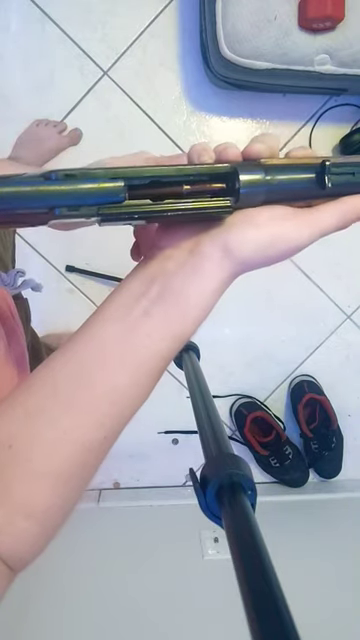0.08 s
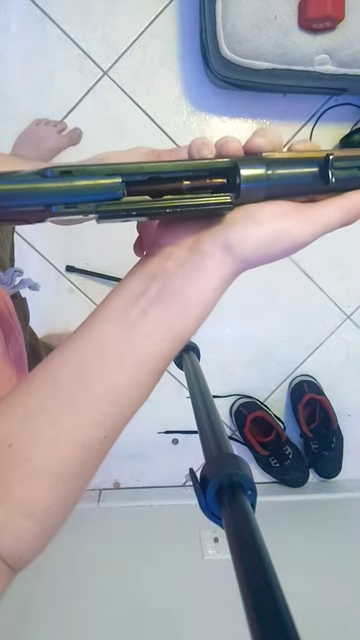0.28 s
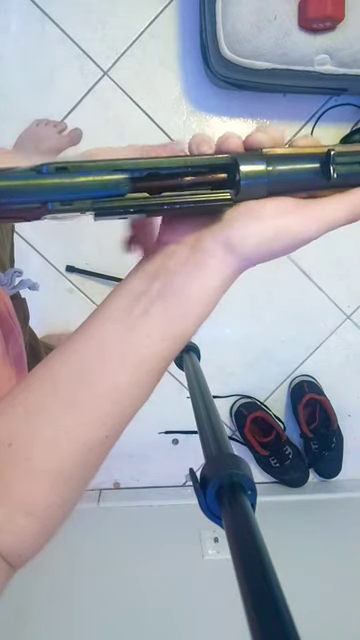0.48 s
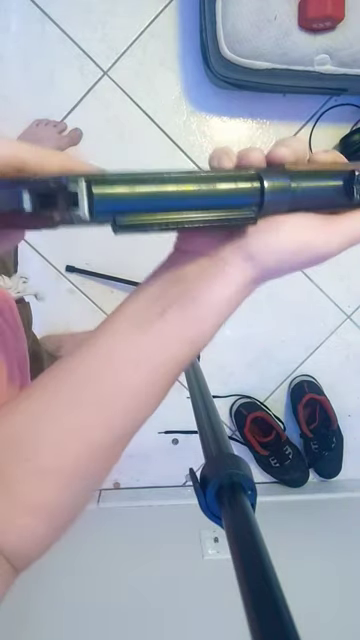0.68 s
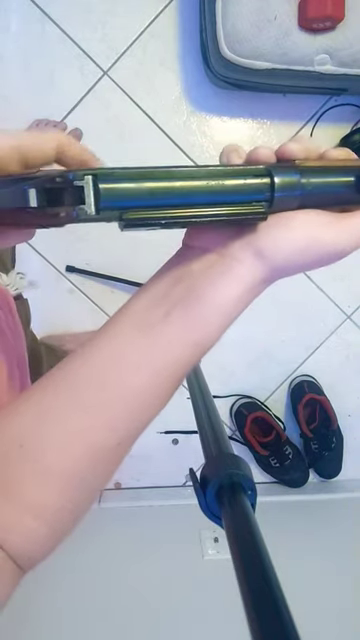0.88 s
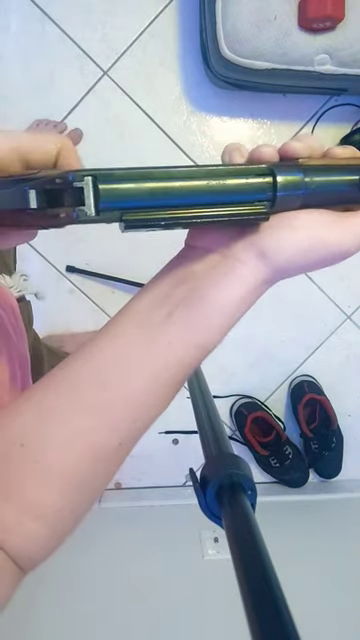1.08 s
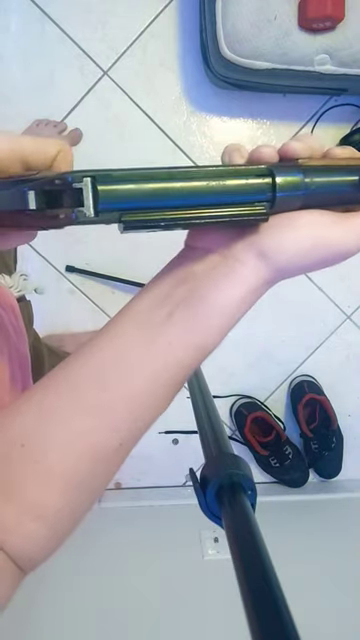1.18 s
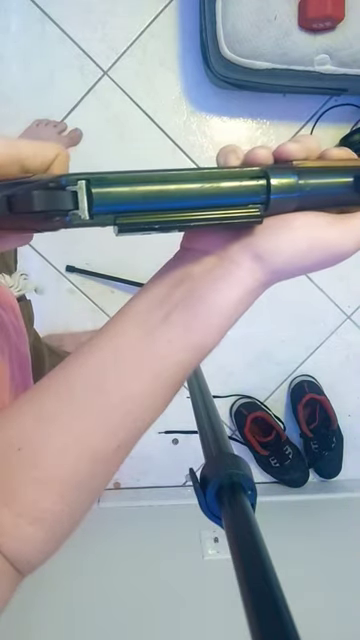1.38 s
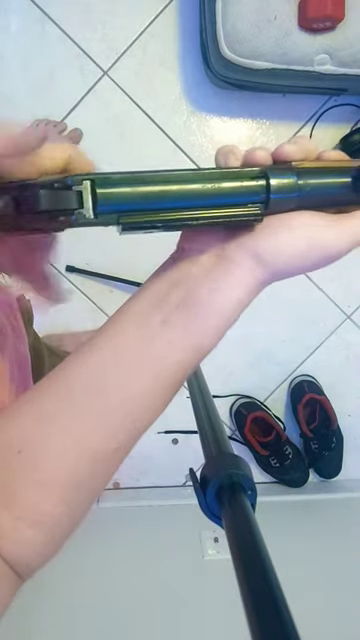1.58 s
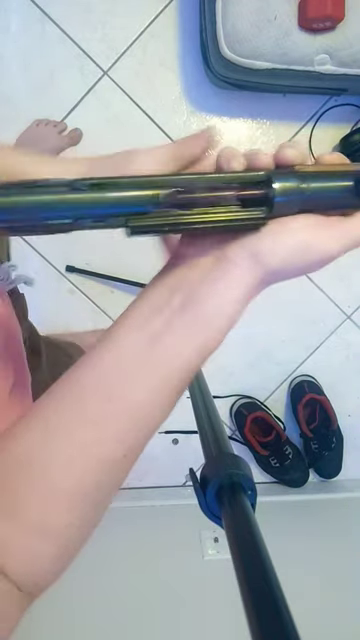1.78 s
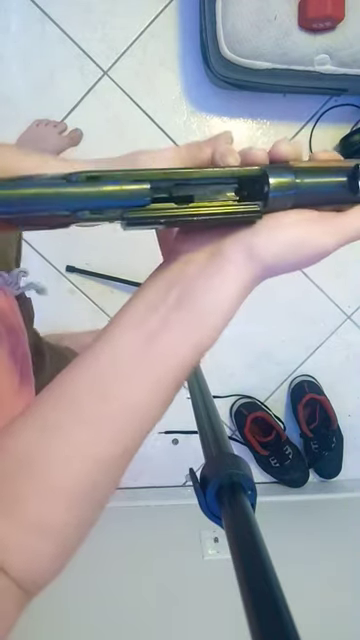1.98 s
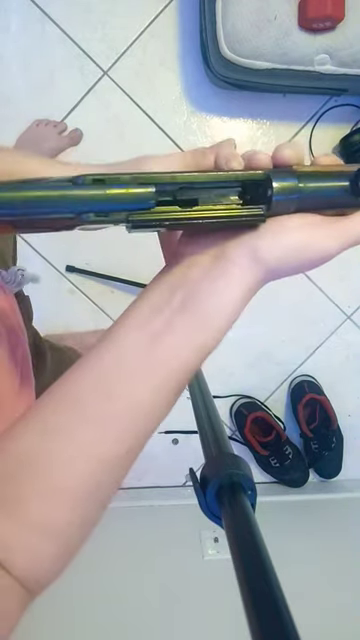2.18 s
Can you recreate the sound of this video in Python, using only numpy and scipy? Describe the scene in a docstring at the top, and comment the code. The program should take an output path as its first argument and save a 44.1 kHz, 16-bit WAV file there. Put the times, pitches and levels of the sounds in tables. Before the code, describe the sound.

Close, bright metallic rifle handling in a hard small room: cartridge clinks and dull knocks on tile, quick closing clacks, a pause, one loud hammer snap, another pause, then a fast opening clatter.

```python
"""Lever rifle in a tiled room

A lever rifle is worked close to a microphone in a small tiled room, over a low murmur of air.
An ejected dummy cartridge bounces on the floor with a thin high ring while the action is closed;
then the trigger clicks, the hammer falls, and the lever is thrown open again.
Knocks and clacks are short bursts of filtered noise, and scrapes are streams of tiny clicks.
Rings are fading sine waves. A noise suppressor turns down the quiet parts."""
import sys
import numpy as np
from scipy import signal
from scipy.fft import rfft, irfft
from scipy.io import wavfile
from scipy.ndimage import uniform_filter1d

SR = 44100
rng = np.random.default_rng(int(sys.argv[2]) if len(sys.argv) > 2 else 0)


def transcribe(u):
    """Save the signal u as a 16-bit wav file named by the first command-line argument.

    u: samples, shape (n,) or (channels, n), limited to [-1, 1]; the rate is SR.
    q: integer samples, one column per channel.
    """
    v = np.clip(np.atleast_2d(u).T, -1, 1)
    q = np.round(v * 32767).astype(np.int16)
    wavfile.write(sys.argv[1], SR, q)


N = 99225


def amp(db):
    """Turns decibels into a gain."""
    return 10 ** (np.asarray(db) / 20)


def unit(x):
    """Scales a sound to an energy of one."""
    return x / np.sqrt(np.sum(x ** 2) + 1e-20)


def read(points, hz):
    """Reads a table between its points, on a log-frequency axis."""
    f, value = np.transpose(points)
    return np.interp(np.log(hz + 1), np.log(f + 1), value)


def add(mix, start_s, sound):
    """Mixes a sound in at a time; anything past the end is dropped."""
    part = mix[max(round(start_s * SR), 0):][:len(sound)]
    part += sound[:len(part)]


# Room murmur, relative spectrum: f/Hz, level/dB
HUSH_SPECTRUM = [(20, -49), (66, -5), (123, -16), (161, -3), (200, -21), (400, -21.5), (800, -29),
                 (2000, -24), (9000, -31), (16000, -49.5)]


def hush():
    """The low murmur of air in the room is steady noise shaped by a spectrum."""
    spectrum = rfft(rng.standard_normal(N)) * amp(read(HUSH_SPECTRUM, np.fft.rfftfreq(N, 1 / SR)))
    return amp(-55) * np.sqrt(N) * unit(irfft(spectrum, N))  # RMS level -55 dB


# Resonances of a struck part: f as a multiple of its main resonance, share of the resonance level
PART_RESONANCES = [(1, 1), (1.43, 0.64), (2.1, .5)]
RESONANCE_WIDTH = 0.07  # half width, as a share of the frequency


def colour(x, points, tilt_db, peak_hz, peak_db, size=2048):
    """A struck part favours its resonances: a causal filter of unit energy with spectrum and tilt."""
    hz = abs(np.fft.fftfreq(size, 1 / SR))
    peaks_db = 0
    for ratio, share in PART_RESONANCES:
        distance = (hz / (ratio * peak_hz) - 1) / RESONANCE_WIDTH
        peaks_db = peaks_db + share * peak_db / (1 + distance ** 2)
    slope_db = tilt_db * np.log2(np.maximum(hz, 200))  # flat below 200 Hz
    log_gain = np.log(amp(read(points, hz) + peaks_db + slope_db))
    # minimum phase: the filter responds as early as its spectrum allows
    taps = np.fft.ifft(np.exp(np.conj(signal.hilbert(log_gain)))).real
    return signal.fftconvolve(x, unit(taps[:size // 2]))


def contact(decay_s, size=4096):
    """Parts chatter as they touch: a fading noise burst, its spectrum evened out before a last fade."""
    fade = np.exp(-np.arange(size) / SR / max(decay_s, 1e-4))
    spectrum = rfft(rng.standard_normal(size) * fade)
    even = irfft(spectrum / (abs(spectrum) + 1e-12))
    return unit(even * np.sqrt(fade)) * np.linalg.norm(fade)  # longer bursts carry more energy


def blows(rows, points):
    """Each row of a table of blows becomes one coloured burst of contact noise."""
    out = np.zeros(N)
    for start_s, db, tilt_db, decay_s, peak_hz, peak_db, *_ in rows:
        burst = colour(contact(decay_s), points, tilt_db, peak_hz, peak_db)
        add(out, start_s, amp(db) * burst)
    return out


# How long the room rings: f/Hz, time to fall 60 dB/s
ROOM_DECAY = [(100, 1), (400, 0.39), (1500, 0.57), (3500, 0.41), (7500, 0.43), (11000, 0.49), (15000, 0.46)]
ROOM_GAP_S, ROOM_RISE_S = 0.0013, 0.011  # silence before the reflections, then their build-up


def tail():
    """Scattered reflections are noise in which each band dies at its own speed."""
    hz, t, bands = signal.stft(rng.standard_normal(SR), SR, nperseg=256)
    fade = amp(-60 * t / read(ROOM_DECAY, hz)[:, None])
    reflections = signal.istft(bands * fade, SR, nperseg=256)[1][:SR]
    build_up = np.clip((np.arange(SR) / SR - ROOM_GAP_S) / ROOM_RISE_S, 0, 1)
    return unit(reflections * build_up)


ECHO_S = 0.084  # delay of the late echo


def room(x, wet_db, late_db=0):
    """The room returns a dense tail, then a late echo with a tail of its own."""
    response = tail()
    add(response, ECHO_S, amp(-22 + late_db) * unit(contact(decay_s=0.0032)))
    add(response, ECHO_S, amp(-6.5 + late_db) * tail())
    return x + amp(wet_db) * signal.fftconvolve(x, response)[:N]


# Cartridge hits the tiles: t/s, clack level/dB, tilt/(dB/octave), decay setting/s, resonance f/Hz,
# resonance level/dB, relative level of the case ring/dB
BOUNCE_HITS = [(.219, -11, -2, 0.005, 8000, 11.5, -6), (.2243, -9, 2, 0.0033, 5500, 6.5, -4.5),
               (.4335, -14, -1, 0.0051, 1900, 12, -2.5), (.4405, -10.5, 6, 0.0039, 14000, 3.5, -2),
               (.5925, -19.5, 2, 0.021, 13000, 8, -2), (0.668, -14, 3.5, 0.018, 13500, 9, -5.5)]
# Clack of case on tile, relative spectrum: f/Hz, level/dB
BOUNCE_SPECTRUM = [(60, -35), (200, -21), (450, -9), (900, -6), (1800, -1), (3000, -4), (5500, -4.5),
                   (8000, -8.5), (10500, -12.5), (15000, -15)]
# Ringing tones of the case mouth: f/Hz, relative level/dB
CASE_TONES = [(11986, 0), (12022, -6), (12066, -12), (11714, -26), (12333, -24)]
CASE_DB, CASE_RISE_S, CASE_T60_S = -3, 0.002, 0.42  # T60: time to fall 60 dB
# depth of the waver in turns of phase, its rate at t = 0 in Hz, and
# half the share of its starting rate that the waver loses each second
TUMBLE_TURNS, TUMBLE_HZ, TUMBLE_HALF_SLOWING = 0.083, 29.92, 0.346


def cartridge():
    """Each bounce clacks on the tile and feeds the ring of the case, which wavers as it tumbles."""
    t = np.arange(N) / SR
    energy = np.zeros(N)
    for start_s, *_, ring_db in BOUNCE_HITS:
        level = amp(ring_db - 60 * t / CASE_T60_S) * (1 - np.exp(-t / CASE_RISE_S))
        add(energy, start_s, level ** 2)
    tumble_turns = TUMBLE_HZ * t * (1 - TUMBLE_HALF_SLOWING * t) + rng.random()
    waver = TUMBLE_TURNS * np.sin(2 * np.pi * tumble_turns)
    tones = np.zeros(N)
    for hz, db in CASE_TONES:
        tones += amp(CASE_DB + db) * np.sin(2 * np.pi * (hz * t + waver + rng.random()))
    ring = np.sqrt(energy) * tones
    clacks = blows(BOUNCE_HITS, BOUNCE_SPECTRUM)
    return room(clacks, wet_db=2.5, late_db=-5) + room(ring, wet_db=-5, late_db=-5)


# Dull knocks of the case and the stock: t/s, level/dB, tilt/(dB/octave), decay setting/s,
# resonance f/Hz, resonance level/dB
KNOCK_HITS = [(.228, -18.5, 3, 0.028, 5540, -3), (.2945, -15, -1.5, 0.0099, 330, 5),
              (.308, -18, 1, 0.022, 193, 7), (.333, -28, -4.5, 0.018, 472, 14),
              (.447, -18, 3, 0.015, 1440, 10), (.464, -16, -0.5, .012, 1220, 9.5),
              (.483, -19, -1, 0.02, 480, 7), (.505, -25.5, -3.5, 0.0073, 284, 12.5),
              (.555, -39, -9, 0.018, 280, 9.5)]
# Dull knock, relative spectrum: f/Hz, level/dB
KNOCK_SPECTRUM = [(60, -25), (180, -14.5), (350, -6.5), (900, -6.5), (1800, 0.5), (3000, -4), (5000, -7),
                  (6500, -25), (10000, -24), (15000, -27.5)]


def knocks():
    """The case and the stock give duller knocks between the bounces: coloured contact bursts."""
    return room(blows(KNOCK_HITS, KNOCK_SPECTRUM), wet_db=-3.5, late_db=-5)


def ringing(modes):
    """Struck metal rings in several tones at once, each fading freely."""
    t = np.arange(SR) / SR
    out = np.zeros(SR)
    for hz, db, t60_s in modes:
        out += amp(db - 60 * t / t60_s) * np.sin(2 * np.pi * (hz * t + rng.random()))
    return out


# Ringing tones of the rifle steel: f/Hz, relative level/dB, time to fall 60 dB/s
STEEL_TONES = [(1360, -8, .4), (1445, -6, .45), (1596, -6, .5), (1986, -4, .5), (2091, -6, .45),
               (2482, -3, .35), (3150, -1, .25), (3401, -2, .4), (5321, -2, .4), (6055, -2, .35),
               (7067, -1, .4), (7596, -2, .35), (9850, -3, .35), (13710, -1, .35)]


def steel(x, ring_db):
    """Blows set the receiver and barrel ringing."""
    return x + amp(ring_db) * signal.fftconvolve(x, unit(ringing(STEEL_TONES)))[:N]


# Action parts meet: t/s, level/dB, tilt/(dB/octave), decay setting/s, resonance f/Hz,
# resonance level/dB
ACTION_CLACKS = [(.648, -17.5, 4, 0.005, 7600, 3.5), (.6745, -12.5, -1.5, 0.0089, 660, 3),
                 (.700, -21.5, -3.5, 0.011, 750, 10.5), (.7275, -13, 0.5, 0.0047, 2000, 11.5),
                 (.7415, -8, 1, 0.0042, 1950, 0), (.7462, -7, 1.5, 0.0046, 5800, -2),
                 (.7645, -29, 1, 0.00067, 6200, 13.5), (.769, -13.5, -2, 0.0092, 700, -2),
                 (1.161, -41, 15, 0.0033, 9000, 12), (1.274, -34, 2.5, 0.015, 1090, 8.5),
                 (1.669, -31, 0, 0.016, 7300, 0.5), (1.7535, -10, 2, 0.005, 5330, 5),
                 (1.7825, -36, -5, 0.0018, 7600, -6), (1.810, -9, .5, 0.0037, 5800, 10.5),
                 (1.8815, -18, .5, 0.0016, 5500, 1), (1.899, -9, 16, .001, 8600, 5),
                 (1.9285, -7.5, 1, 0.0082, 2500, 7.5), (1.938, -9, 5, 0.001, 2290, 7.5)]
# Clack of the action, relative spectrum: f/Hz, level/dB
CLACK_SPECTRUM = [(60, -40.5), (280, -37), (430, -20.5), (570, -5.5), (950, -13.5), (1400, -0.5), (2000, 2),
                  (3000, -1.5), (3600, 3), (4100, 2), (6000, 3), (8500, 1.5), (11000, -1.5), (15000, -4)]
# Bolt slides: start t/s, length/s, level/dB, tilt/(dB/octave), squeak f/Hz
BOLT_SLIDES = [(0.65, 0.14, -30.5, -4.5, 6300), (1.751, .055, -22, 0, 7400),
               (1.815, 0.031, -22.5, -1.5, 8600), (1.849, 0.025, -27, 3, 6100),
               (1.873, 0.011, -19, -2, 5900), (1.903, 0.048, -31.5, -5, 4950)]
# Scrape of the bolt, relative spectrum: f/Hz, level/dB
SCRAPE_SPECTRUM = [(100, -36.5), (900, -21.5), (1800, -7.5), (3500, -9.5), (5800, -1), (8200, -3.5),
                   (11000, -6.5), (15000, -10.5)]
SLIPS_PER_S, SLIP_SPREAD_DB, SQUEAK_DB = 3500, 2, 8


def action():
    """The bolt scrapes along its rails in tiny slips, and the parts clack at their stops."""
    out = blows(ACTION_CLACKS, CLACK_SPECTRUM)
    for start_s, length_s, db, tilt_db, squeak_hz in BOLT_SLIDES:
        chance = rng.random(SR)
        sign_draw, level_draw = rng.standard_normal((2, SR))
        n = int(length_s * SR)
        happens = chance < SLIPS_PER_S / SR
        slips = (happens * np.sign(sign_draw) * amp(SLIP_SPREAD_DB * level_draw))[:n]
        scrape = colour(unit(slips), SCRAPE_SPECTRUM, tilt_db, squeak_hz, SQUEAK_DB)
        add(out, start_s, amp(db) * np.sqrt(n) * scrape)
    return room(steel(out, ring_db=-20), wet_db=-1)


# Hammer lands in two quick contacts: t/s, level/dB, tilt/(dB/octave), decay setting/s,
# resonance f/Hz, resonance level/dB
HAMMER_HITS = [(1.3557, -10.5, 2.5, 0.0016, 550, 9.5), (1.3613, -3, 2.5, 0.0037, 3205, 7)]
# Hammer blow, relative spectrum: f/Hz, level/dB
HAMMER_SPECTRUM = [(60, -7), (300, -10.5), (600, -1.5), (950, -7.5), (1400, 3.5), (2200, -2), (3200, -1),
                   (4200, -0.5), (7300, 2.5), (11000, -2.5), (15000, -7)]
THUMP_DB, THUMP_HZ, THUMP_DECAY_S = -15, 89, 0.0043
BOOM_DB, BOOM_HZ, BOOM_DELAY_S, BOOM_WIDTH_S = -40.5, 96, 0.14, 0.074


def hammer():
    """The hammer snaps down; its jolt thumps and wakes a low boom that swells and fades."""
    snap = steel(blows(HAMMER_HITS, HAMMER_SPECTRUM), ring_db=-16)
    out = room(snap, wet_db=1.5, late_db=2.0)
    t = np.arange(SR) / SR
    thump = amp(THUMP_DB) * np.exp(-t / THUMP_DECAY_S) * np.cos(2 * np.pi * THUMP_HZ * t)
    swell = np.exp(-((t - BOOM_DELAY_S) / BOOM_WIDTH_S) ** 2)
    boom = amp(BOOM_DB) * swell * np.sin(2 * np.pi * BOOM_HZ * t)
    add(out, HAMMER_HITS[-1][0], thump + boom)  # with the last contact
    return out


def scene():
    """All sources meet at one microphone."""
    return (hush() + cartridge() + knocks() + action() + hammer())[None]


# Noise suppressor: f/Hz, deepest cut/dB
DEEPEST_CUT = [(150, 1.5), (700, 0), (2500, 13), (8000, 13), (15000, 37)]
OPEN_DB, KNEE_DB = -62, 6  # band level at half the cut, and softness of the change


def suppress(x):
    """A noise suppressor turns down each band as it grows quiet."""
    hz, _, bands = signal.stft(x, SR, nperseg=256, noverlap=192)
    power = uniform_filter1d(abs(bands) ** 2, size=9, axis=1)  # smooth over frequency
    power = uniform_filter1d(power, size=5, axis=2)  # smooth over time
    level_db = 10 * np.log10(abs(power) + 1e-16)
    shut = 0.5 - 0.5 * np.tanh((level_db - OPEN_DB) / (2 * KNEE_DB))  # 0 open, 1 fully cut
    gain = amp(-shut * read(DEEPEST_CUT, hz)[:, None])
    return signal.istft(bands * gain, SR, nperseg=256, noverlap=192)[1][:, :N]


def record(dry):
    """Noise suppression, clipping at full scale, then a low-pass filter at 15600 Hz."""
    clipped = np.clip(suppress(dry), -1, 1)
    low_pass = signal.firwin(401, 15600, window=("kaiser", 8), fs=SR)
    return signal.oaconvolve(clipped, low_pass[None], "same")


dry = scene()
out = record(dry)
transcribe(out)
```